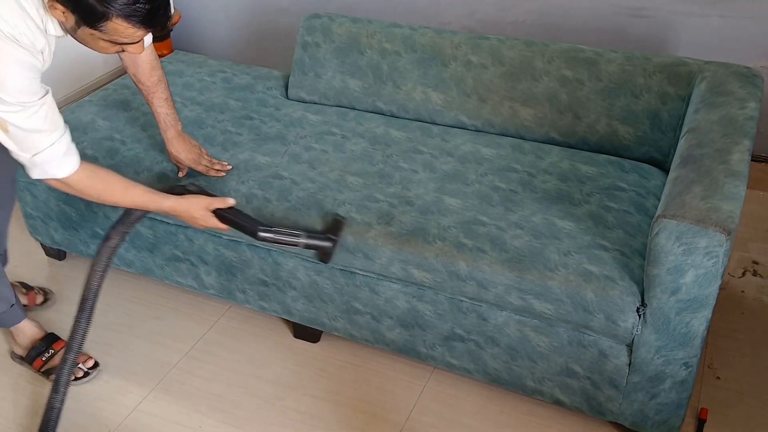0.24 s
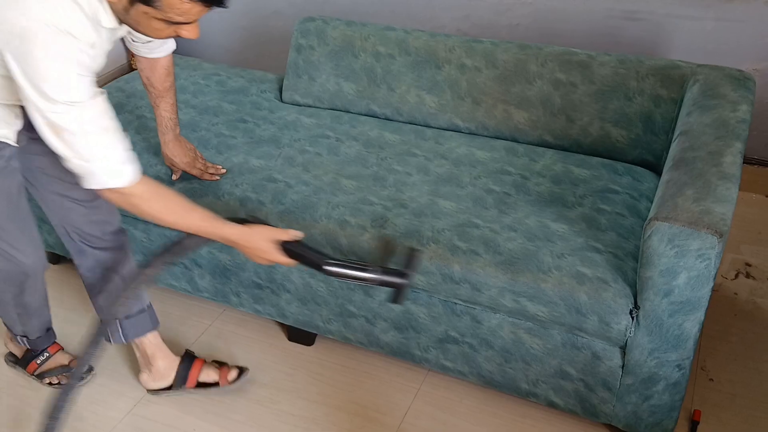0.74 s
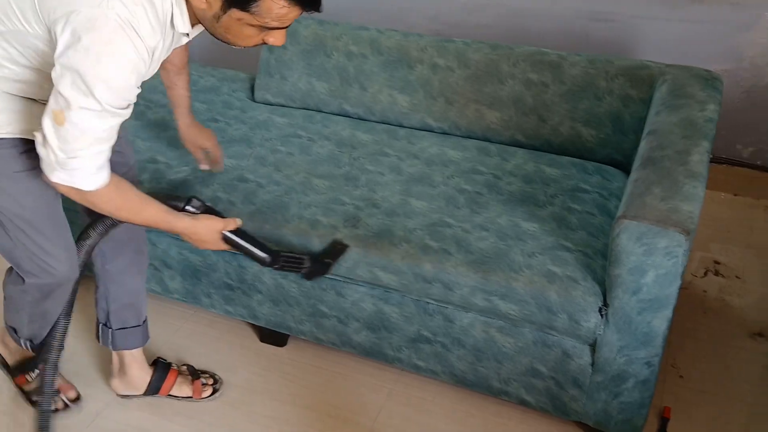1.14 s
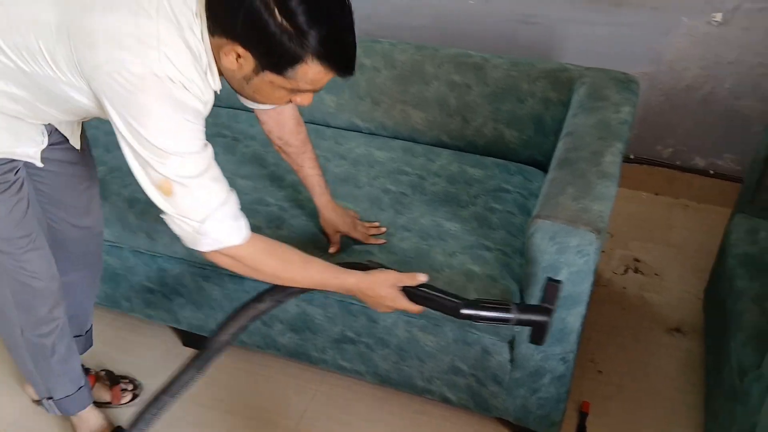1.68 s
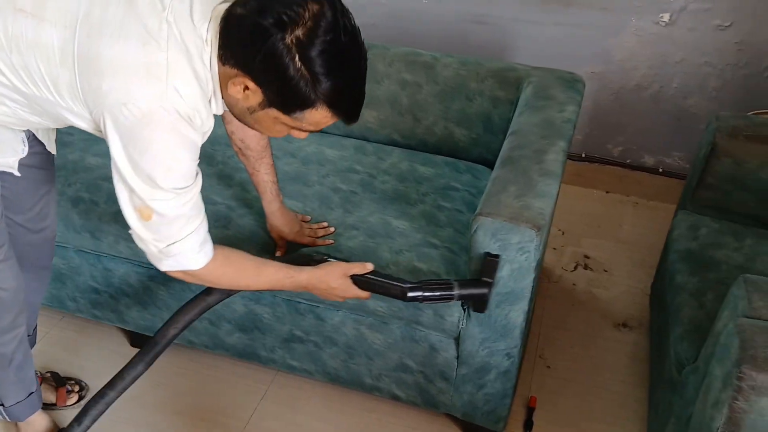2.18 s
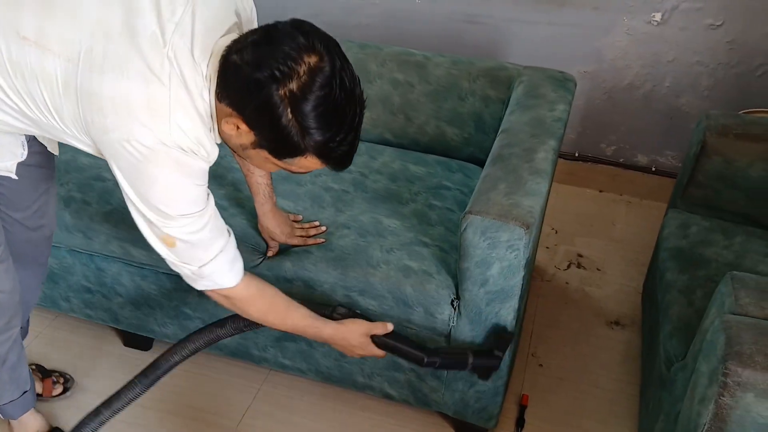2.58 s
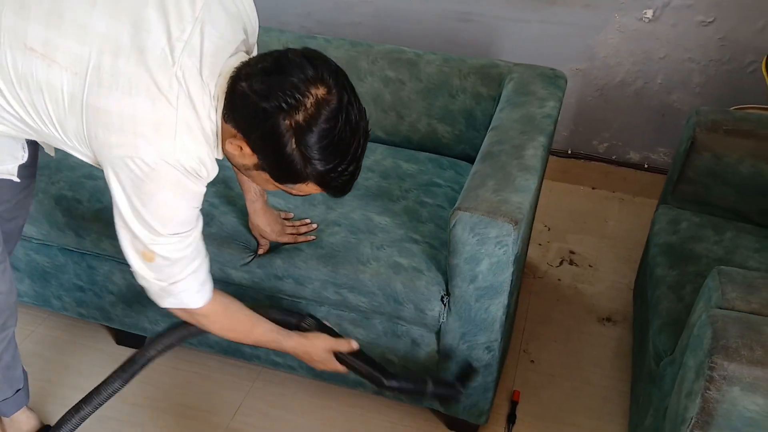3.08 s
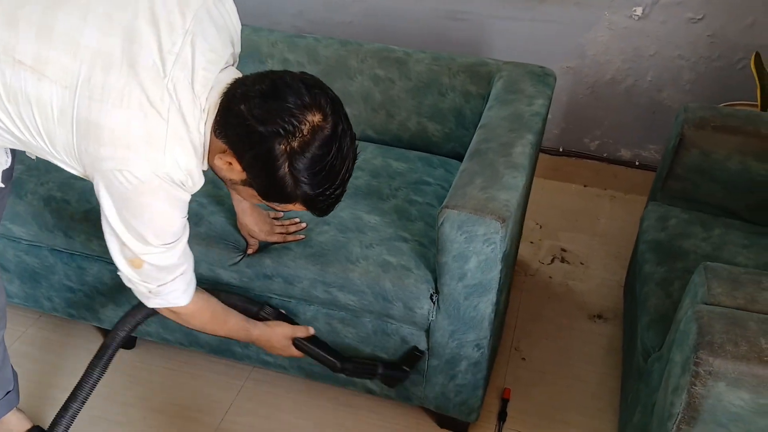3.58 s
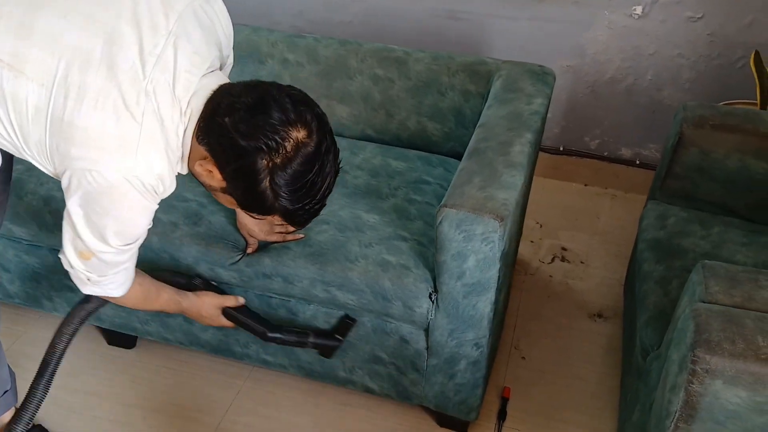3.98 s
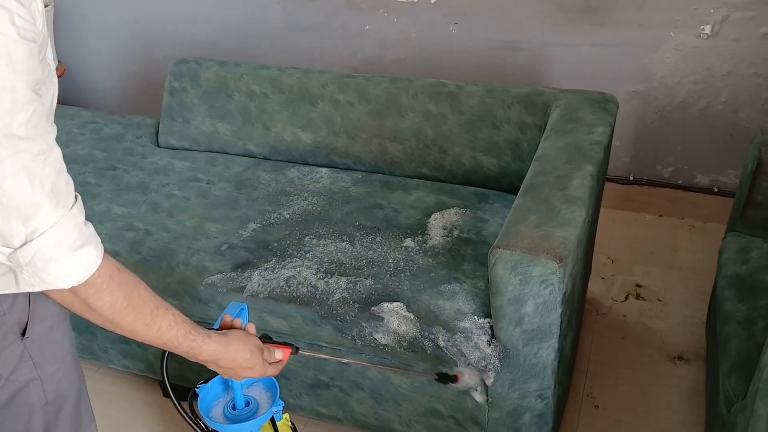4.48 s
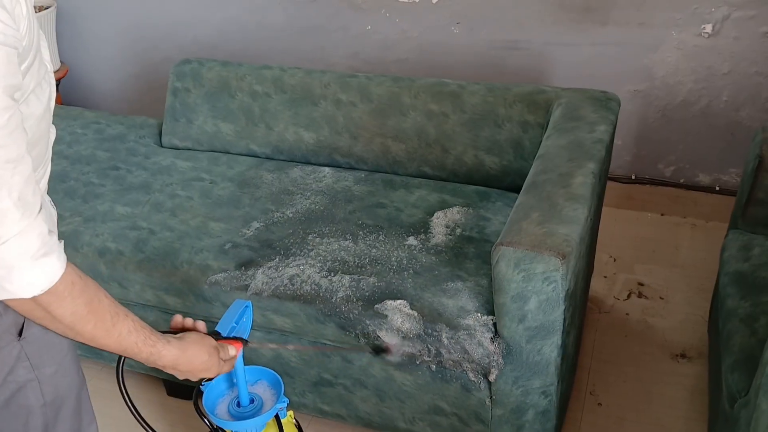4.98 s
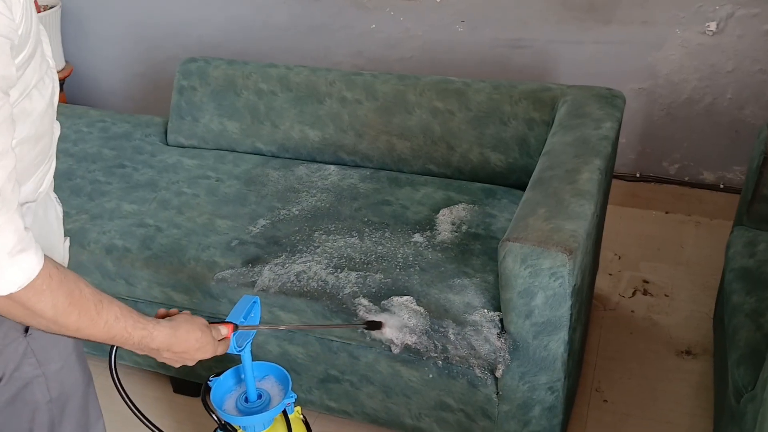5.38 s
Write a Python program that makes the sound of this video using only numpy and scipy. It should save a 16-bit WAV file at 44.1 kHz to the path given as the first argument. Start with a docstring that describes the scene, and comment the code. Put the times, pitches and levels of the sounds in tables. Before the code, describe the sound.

From 0 to about 4.2 seconds a vacuum cleaner runs steadily indoors, heard fairly close in stereo. A nearly pure mid-low motor hum begins toward the right, drifts closer to the centre and strengthens slightly. Above it lie broad rushing air and high, worn-bearing whines that beat, waver and shift between the ears. Short squeals flare irregularly, notably near 0.7, 1.5, 3.2 and 3.7 seconds, while a thin, high chatter flutters about ten times a second. The airy hiss rises briefly at the start, then slowly eases. Very soft, dull bumps, almost masked, fall near 0.3, 0.7, 1.6 and 3.4 seconds. At about 4.17 the motor stops abruptly. After a twentieth of a second of silence, a far quieter low pump hum enters suddenly, with faint room murmur and fluctuating foam-spray hiss that swells gently around 5.2 seconds and continues to the end.

```python
"""A vacuum cleaner hums, whines, squeals and chatters indoors while its nozzle is drawn over a sofa.
Sines locked to one shaft give the rotor hum and the tones of a worn ball bearing; coloured noise gives
the rush of air, and short decaying tones a few soft bumps. The motor sound stops abruptly; after 50 ms of
silence there is only the low sine hum of a small pump and the faint noise hiss of foam sprayed on cloth."""
import sys
import numpy as np
from scipy import signal
from scipy.fft import rfft, irfft
from scipy.io import wavfile
from scipy.ndimage import map_coordinates

SR = 44100
rng = np.random.default_rng(int(sys.argv[2]) if len(sys.argv) > 2 else 0)


def file_out(sig):
    """Save sig as 16-bit WAV at sys.argv[1]."""
    # one column per channel
    cols = np.atleast_2d(sig).T
    # limit, then scale
    lim = np.clip(cols, -1, 1)
    pcm = np.round(lim * 32767).astype(np.int16)
    wavfile.write(sys.argv[1], SR, pcm)


N = 248715
TIME = np.arange(N) / SR  # s
FREQS = np.maximum(np.arange(N // 2 + 1) * SR / N, 1)  # Hz, kept above zero for the logarithm
MOTOR_OFF_S, PUMP_ON_S = 4.173, 4.223
SHAFT_HZ = 363.65  # nominal speed, in turns per second


def undb(db):
    """Level and amplitude: decibels to gain."""
    return 10 ** (np.asarray(db) / 20)


def curves(table):
    """Linear interpolation: the columns of a table, joined by straight lines in time."""
    s, *columns = np.transpose(table)
    return np.array([np.interp(TIME, s, column) for column in columns])


def walk(rate):
    """Band-limited randomness: a smooth curve of spread about 1 through `rate` random knots a second."""
    knots = rng.standard_normal(2048)
    coarse_time = TIME[::64]
    smooth = map_coordinates(knots, [coarse_time * rate + 2], order=3, mode="wrap")
    return np.interp(TIME, coarse_time, smooth)


def flutter(rate):
    """Random modulation: a complex gain of mean power about 1 that wanders in size and phase."""
    return (walk(rate) + 1j * walk(rate)) / np.sqrt(2)


def swell_at(centre_s, length_s):
    """Gaussian envelope: a smooth rise and fall of height 1, length_s wide at half height."""
    return .5 ** ((2 * (TIME - centre_s) / length_s) ** 2)


def tone(phase, gain):
    """Phasor: a sine whose rms and phase offset are given by a complex gain."""
    return np.sqrt(2) * (np.real(gain) * np.cos(phase) - np.imag(gain) * np.sin(phase))


def room_tone(turn, row, rough, rough_rate):
    """Standing waves: a motor tone swells and fades as the listener moves across them."""
    hz, db, pan_db, loudest_s, swell_db = row
    swell_period_s, ear_lag_s = 5, .0003
    swell = undb(swell_db * np.cos(2 * np.pi * (TIME - loudest_s) / swell_period_s))
    # the mean power stays as given while the motor runs
    swell = swell / np.sqrt(np.mean(swell[TIME < MOTOR_OFF_S] ** 2) * (1 + rough ** 2))
    start = 2 * np.pi * rng.random()
    # reflections scramble the phase between the ears, the more so for short waves
    scramble = min((hz / 3000) ** 2, 1.2)
    ears = []
    for side in (.5, -.5):  # left, right
        arrival = start + 2 * np.pi * hz * side * ear_lag_s + scramble * walk(1.5)
        wave = tone(turn * hz / SHAFT_HZ + arrival, 1 + rough * flutter(rough_rate))
        ears.append(undb(db + side * pan_db) * swell * wave)
    return np.array(ears)


def room_noise(spectrum, alike_hz, lag_ms):
    """Spatial coherence: in coloured noise long waves reach both ears alike, the right a little later."""
    hz, *ears = np.transpose(spectrum)
    colour = undb([np.interp(np.log(FREQS), np.log(hz), db) for db in ears])
    shared, left, right = rfft(rng.standard_normal((3, N)))
    alike = 1 / (1 + (FREQS / alike_hz) ** 2)  # share of the power common to both ears
    delay = np.exp(-2j * np.pi * FREQS * lag_ms / 1000)
    arrival = np.array([np.ones(len(FREQS)), delay])
    mix = np.sqrt(alike) * shared * arrival + np.sqrt(1 - alike) * np.array([left, right])
    return irfft(mix * colour, N) * np.sqrt(SR / 2)


def treble(x, hz):
    """High-pass filtering without phase shift: the amplitude is halved at hz and falls away below."""
    return irfft(rfft(x) / (1 + (hz / FREQS) ** 4), N)


def vacuum():
    """Common shaft: rotor and bearing tones follow one speed, which creeps up and wavers very slightly."""
    nominal_at_s, creep_hz_per_s, waver_hz = 2, .09, .1
    hz = SHAFT_HZ + creep_hz_per_s * (TIME - nominal_at_s) + waver_hz * walk(5)
    turn = 2 * np.pi * np.cumsum(hz) / SR  # shaft angle in radians
    return rotor(turn) + bearing(turn) + cage(turn) + airflow() + bumps()


def rotor(turn):
    """Unbalance: a once-a-turn force gives a strong, nearly pure hum with weak harmonics."""
    # Hum, drifting from the right towards the centre. Each row: time in seconds, relative level in dB,
    # left minus right in dB.
    hum_levels = [(0.0, -18.5, -6.5), (1.02, -18.5, -5), (2.0, -16, -2.5), (4.15, -15.5, -1.0)]
    # Shaft harmonics. Each row: multiple of the shaft rate, relative level in dB, left minus right in dB,
    # loudest moment in seconds, swell in dB either way.
    shaft_orders = [(2, -38.5, 0, 1.5, 1.5), (3, -43, -5, 2.6, 2), (4, -44, -4, 2.6, 2),
                    (5, -42, -3, 2.7, 2), (6, -49, -3, 1.7, 2), (7, -49, -4, 1.0, 2), (12, -50, -1, 0.8, 1)]
    db, pan_db = curves(hum_levels)
    ears_db = db + np.array([pan_db, -pan_db]) / 2
    hum = tone(turn, undb(ears_db + 0.21 * walk(21.82)) * np.exp(.02j * walk(23)))
    harmonics = sum(room_tone(turn, (k * SHAFT_HZ, *rest), rough=0.16, rough_rate=14)
                    for k, *rest in shaft_orders)
    return undb(-0.45) * hum + undb(-0.5) * harmonics


def bearing(turn):
    """Ball-pass frequencies: seven balls roll over flaws in both races; the two loudest whines beat."""
    # Third harmonic of the balls passing the outer race. Each row: time in seconds, relative left level
    # in dB, relative right level in dB.
    outer_whine = [(0.0, -25.5, -24), (1.3, -28, -26.5), (1.5, -38.5, -33), (1.7, -30, -25.5),
                   (2.5, -35.5, -28.5), (2.9, -29, -50), (3.4, -33, -44), (4.17, -29, -25.5)]
    # Second harmonic of the inner race less one shaft turn. Each row: time in seconds, relative left
    # level in dB, relative right level in dB.
    inner_whine = [(0.0, -42.5, -30.5), (0.7, -38, -32.5), (1.0, -48, -31.5), (1.6, -39.5, -23.5),
                   (3.0, -31, -33), (3.4, -32.5, -30), (4.17, -23.5, -32.5)]
    # Weaker tones. Each row: frequency at nominal speed in Hz, relative level in dB, left minus right
    # in dB, loudest moment in seconds, swell in dB either way.
    bearing_tones = [(146, -59, -3, 2.5, 1), (549, -47.5, 0, 1.5, 1), (791, -49, 3, 1.0, 3),
                     (966, -35.3, -2, 2.0, 0.5), (1168, -44.5, 7, 0.7, 7), (1217, -42, -2, 4.4, 2),
                     (1308, -46, -5, 4.2, 4), (1445, -44, -2, 2.6, 4), (1580, -46, -9, 1.6, 1),
                     (1943, -41, -9, 1.0, 3), (2067, -50, -2, 2.5, 2), (2432, -49, 1, 0.5, 5),
                     (3036, -44, 3, 2.6, 2), (3157, -43.5, 6, 0.6, 4), (3262, -51, -1, 2.0, 2),
                     (3725, -51, -1, 4.1, 3), (3782, -49, 5, 3.7, 3), (3865, -50, 2, 0.8, 4),
                     (3922, -49, 6, 0.6, 1), (4737, -51, 4, 0.3, 2), (4831, -42.5, -6, 3.6, 2),
                     (4966, -51, 0, 1.0, 1), (5227, -48, -1, 3.1, 2), (5659, -52, -2, 3.4, 3),
                     (5795, -50, -1, 1.0, 3), (6317, -52.5, -1, 5.0, 3), (6401, -50.5, 1, 4.2, 1),
                     (6624, -49.5, 0, 2.5, 1), (6681, -55.5, 1, 2.7, 4), (6761, -48.5, 3, 2.1, 5),
                     (6899, -49, 1, 3.3, 4), (7590, -58.5, -1, 0.4, 1), (9528, -59.5, -9, 3.0, 5),
                     (9660, -55.5, -10, 1.1, 6), (9795, -52, -6, 0.5, 7), (10072, -60.5, -7, 3.9, 6),
                     (10602, -61.5, -9, 2.3, 2), (10761, -62.5, -8, 4.5, 3), (11050, -57.5, -10, 1.8, 1)]
    balls, cage_ratio = 7, .37941  # cage turns per shaft turn
    outer = balls * cage_ratio * turn
    inner = balls * turn - outer
    whines = 0
    for phase, table in ((3 * outer, outer_whine), (2 * inner - turn, inner_whine)):
        path = np.array([np.exp(.4j * walk(2)) * (1 + .15 * flutter(16)) for _ in range(2)])
        whines = whines + tone(phase, undb(curves(table)) * path)
    weak = sum(room_tone(turn, row, rough=0.14, rough_rate=18) for row in bearing_tones)
    return undb(-0.5) * whines + undb(-1.0) * squeal(turn) + undb(0.5) * weak


def squeal(turn):
    """Sliding friction: skidding balls squeal in short swells, wandering in phase and strength."""
    # Squeals just under the two whines. Each row: loudest moment in seconds, length in seconds, relative
    # left level in dB, relative right level in dB.
    squeals = [(.05, .14, -33, -40), (0.718, 0.092, -25, -42), (1.1, .12, -35, -38), (1.3, 0.099, -30, -41),
               (1.542, 0.16, -25.5, -27), (1.938, 0.14, -39, -29), (2.55, 0.18, -43, -41),
               (3.16, 0.094, -30, -22.5), (3.28, 0.05, -38, -28), (3.47, .2, -43, -24),
               (3.7, 0.12, -39, -22.5), (4.01, 0.13, -40, -24)]
    squeal_hz = 2755.5  # at nominal speed
    swells = sum(undb([[left], [right]]) * swell_at(s, length) for s, length, left, right in squeals)
    # a faint, restless squeal fills the gaps
    restless = undb(-39) * np.abs([flutter(12) for _ in range(2)])
    skid = np.exp(1.6j * walk(7)) * undb(walk(15))
    path = np.array([np.exp(.5j * walk(4)) for _ in range(2)])
    return tone(turn * squeal_hz / SHAFT_HZ, np.hypot(swells, restless) * skid * path)


def cage(turn):
    """Amplitude modulation: the loose ball cage chatters in short, uneven chirps, about ten a second."""
    # Three close chatter tones, the middle one weak: frequencies at nominal speed in Hz.
    chatter_hz = (5097, 5229, 5364)
    # Lower tone. Each row: time in seconds, relative left level in dB, relative right level in dB.
    chatter_low = [(0.0, -33, -38), (1.9, -36, -42), (2.2, -40, -49.0), (2.9, -37.5, -43), (3.2, -43, -56),
                   (4.17, -33.5, -55)]
    # Upper tone. Each row: time in seconds, relative left level in dB, relative right level in dB.
    chatter_high = [(0.0, -45.0, -40.5), (2.1, -44.0, -42.5), (2.3, -48.0, -50.0), (3.0, -47.5, -50.0),
                    (3.3, -39.5, -44.0), (4.17, -35.5, -48.5)]
    chirps_per_s, unevenness, depth = 10, 0.353, 0.53
    trim_db, scatter_db = -2.8, 1
    chatter = 0
    for hz, db in zip(chatter_hz, (curves(chatter_low), -54.5, curves(chatter_high))):
        beat = 2 * np.pi * np.cumsum(chirps_per_s * (1 + unevenness * walk(8))) / SR
        chirps = (1 + depth * np.cos(beat)) * undb(trim_db + scatter_db * walk(10))
        slip = np.exp(1.3j * walk(18))
        path = np.array([np.exp(.5j * walk(4)) + .35 * flutter(22) for _ in range(2)])
        chatter = chatter + tone(turn * hz / SHAFT_HZ, undb(db) * chirps * slip * path)
    return chatter


def airflow():
    """Turbulence: air rushes as broad noise; its hiss fades as the nozzle moves away along the sofa."""
    # Rush through motor and hose. Each row: frequency in Hz, relative left level in dB per Hz, relative
    # right level in dB per Hz.
    air = [(25, -86, -86), (65, -73, -72), (175, -76, -76.5), (310, -60.5, -61), (880, -62.5, -61.5),
           (1400, -65.5, -64), (1850, -64.5, -60), (2900, -65.5, -63.5), (4300, -69.8, -71.6),
           (7700, -75.5, -74.5), (8150, -89, -89), (9400, -83, -79), (11500, -81.5, -76.5),
           (15000, -83.5, -81)]
    peak_s, peak_db, rise_db_per_s, fade_db_per_s = 0.24, 0.9, 8, .45
    rush = room_noise(air, alike_hz=1170, lag_ms=0.32)
    hiss = treble(rush, 3500)
    since = TIME - peak_s
    suction_db = peak_db + np.minimum(rise_db_per_s * since, -fade_db_per_s * since)
    body = undb(-0.3 + 1.0 * walk(9)) * (rush - hiss)
    return body + undb(suction_db + 0.41 * walk(19)) * hiss


def bumps(rise_s=0.01, decay_s=0.056):
    """Damped impact: a padded blow sets floor or cushion in a short, dull swing."""
    # Soft bumps of feet and nozzle. Each row: start in seconds, relative level in dB, pitch in Hz.
    blows = [(.312, -41, 94), (.725, -45, 79.6), (1.615, -49, 110), (3.375, -49, 71)]
    thuds = 0
    for s, db, hz in blows:
        age = np.maximum(TIME - s, 0)
        shape = (1 - np.exp(-age / rise_s)) * np.exp(-age / decay_s)
        gain = undb(db) * shape / shape.max() * (0.79 + 0.91 * flutter(70))
        thuds = thuds + tone(2 * np.pi * hz * age, gain)
    return thuds


def sprayer():
    """Periodic and turbulent sources: a pump holds one low note while foam hisses from the lance."""
    # Foam hiss and room. Each row: frequency in Hz, relative left level in dB per Hz, relative right
    # level in dB per Hz.
    spray = [(25, -80, -79), (55, -72, -71.5), (130, -79.5, -78.5), (250, -80.5, -79.5), (350, -78.5, -77),
             (480, -84.5, -83.5), (950, -85, -84.5), (1500, -82.5, -80.5), (2200, -80.5, -77.5),
             (2650, -84.3, -84), (7000, -87, -87), (8200, -93.4, -91.8), (11000, -90.3, -86.8),
             (15000, -90.3, -88.3)]
    # Low murmur of the room under the pump. Each row: time in seconds, relative level in dB.
    room_low = [(4.44, 0), (4.6, -3), (5.4, 0.5)]
    pump_hz, pump_db, sag_db = 80, -35, 2
    # the pump level sags briefly twice, half a second apart
    sags = sum(swell_at(s, .1) for s in (4.3, 4.8))
    ears_db = pump_db - sag_db * sags + np.array([[-.6], [.6]])
    hum = tone(2 * np.pi * pump_hz * TIME, undb(ears_db + 0.33 * walk(23)))
    air = room_noise(spray, alike_hz=990, lag_ms=0.085)
    upper, jet = treble(air, 630), treble(air, 2600)
    murmur = undb(curves(room_low) + .8 * walk(9)) * (air - upper)
    middle = undb(0.5 + 1.6 * walk(10) + .5 * walk(4.16)) * (upper - jet)
    # the foam jet swells gently to a crest and eases off again
    jet_db = -0.5 + 2.4 * swell_at(5.23, 0.3) + 1.3 * walk(18)
    return hum + murmur + middle + undb(jet_db) * jet


def scene():
    """Superposition in time: the vacuum cleaner, a short silence, then the sprayer."""
    after = np.maximum(TIME - MOTOR_OFF_S, 0)
    running = .95 * np.exp(-after / .0005) + .05 * np.exp(-after / .006)  # abrupt stop, faint short tail
    spraying = np.clip((TIME - PUMP_ON_S) / .003, 0, 1)
    return vacuum() * running + sprayer() * spraying


def record(dry):
    """Band limiting: a steep elliptic low-pass removes nearly everything above 15.6 kHz."""
    return signal.sosfilt(signal.ellip(12, .1, 85, 15600, fs=SR, output="sos"), dry)


dry = scene()
out = record(dry)
file_out(out)
```